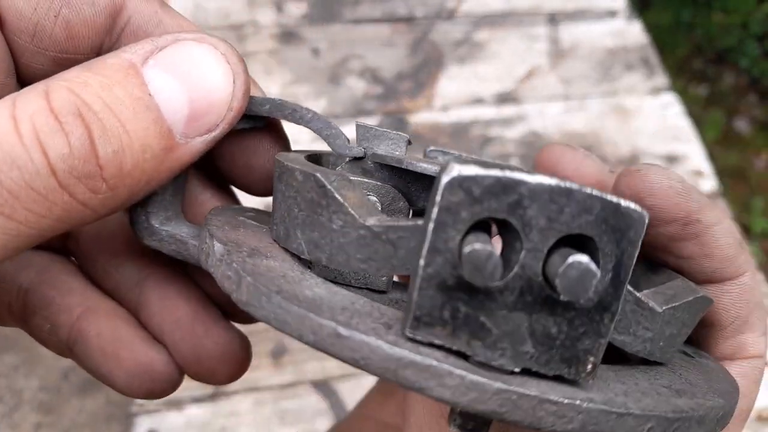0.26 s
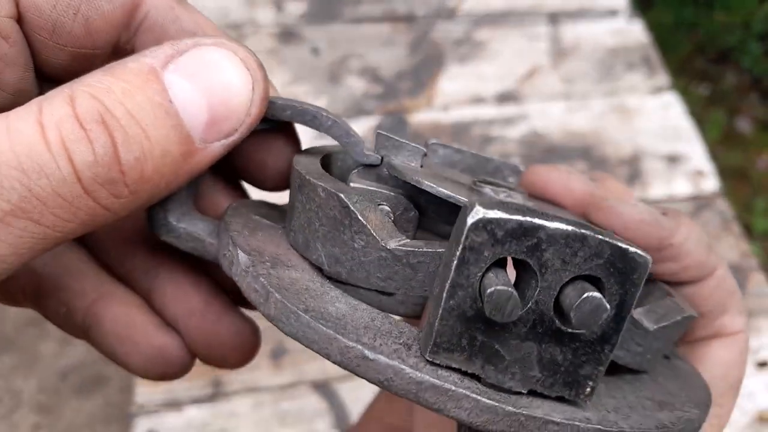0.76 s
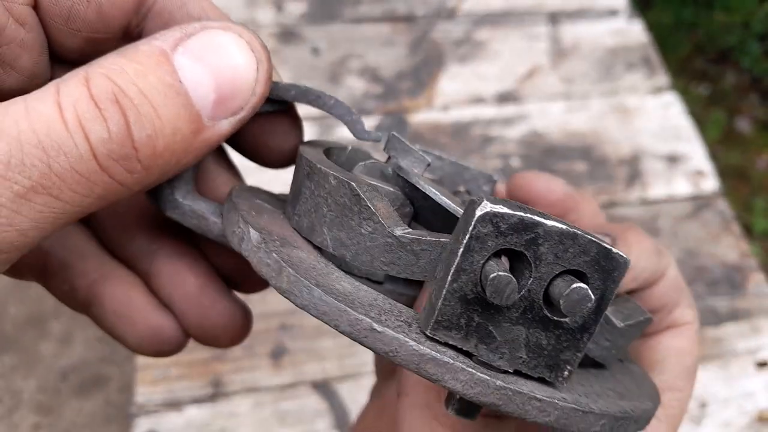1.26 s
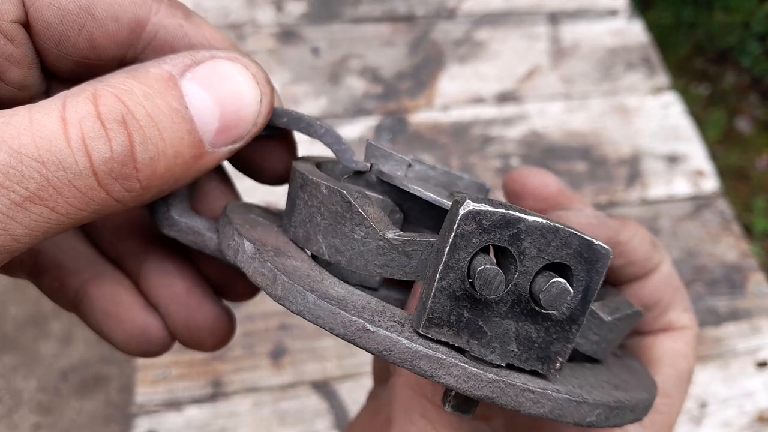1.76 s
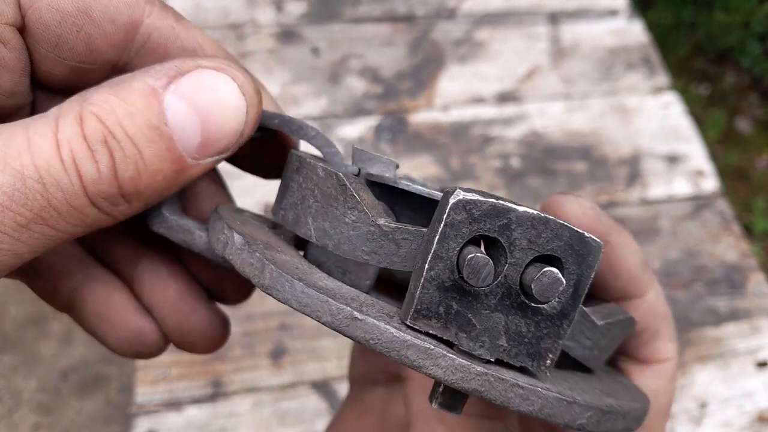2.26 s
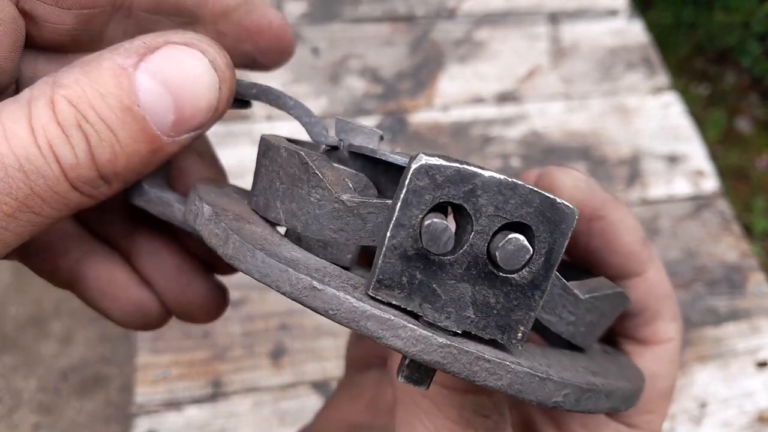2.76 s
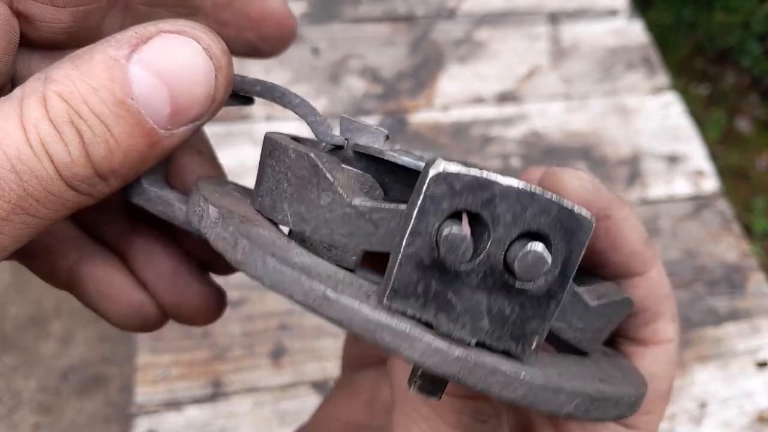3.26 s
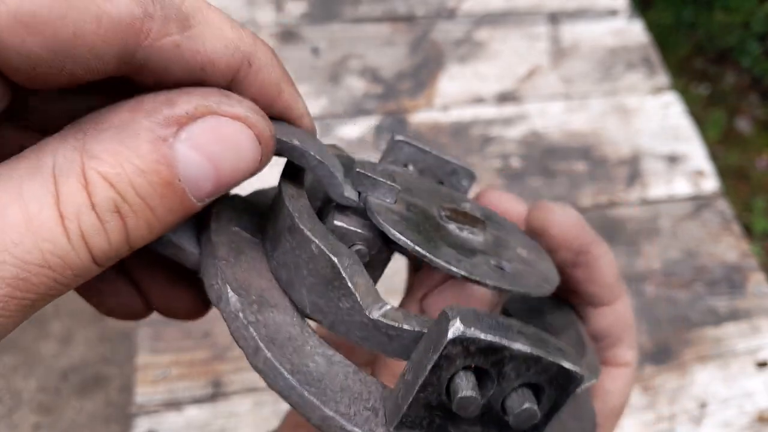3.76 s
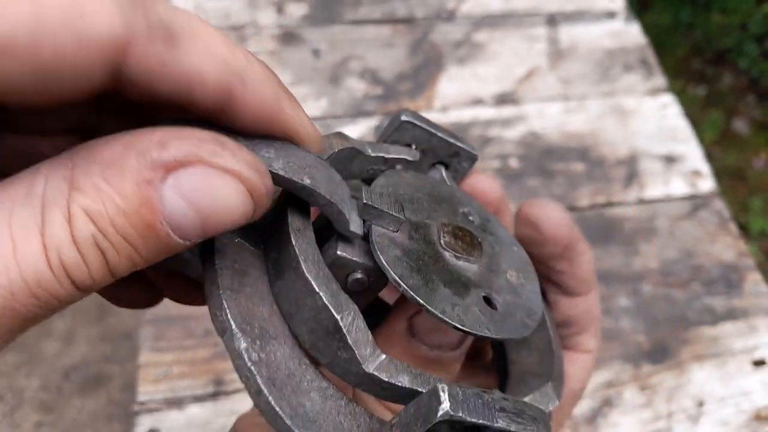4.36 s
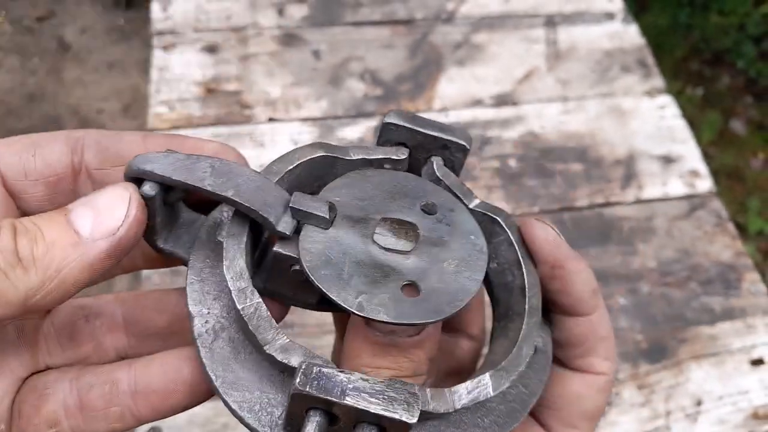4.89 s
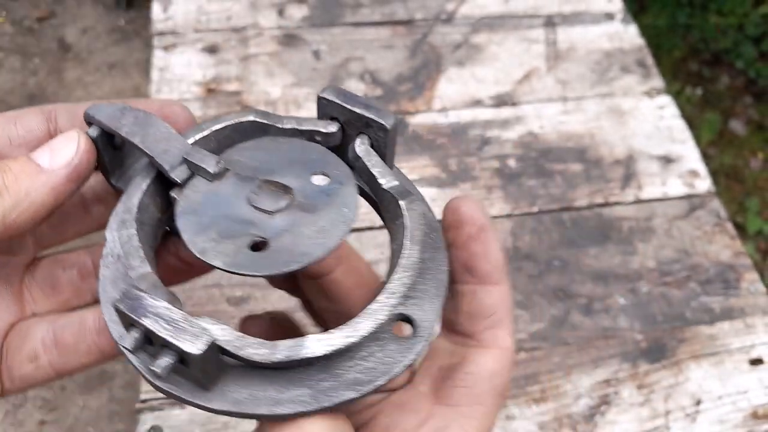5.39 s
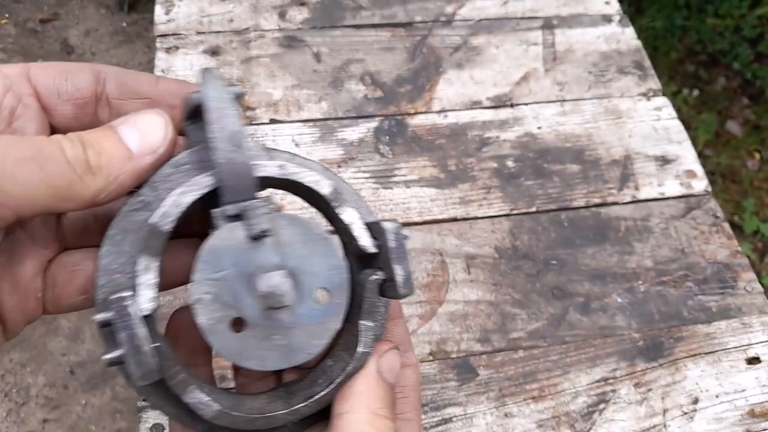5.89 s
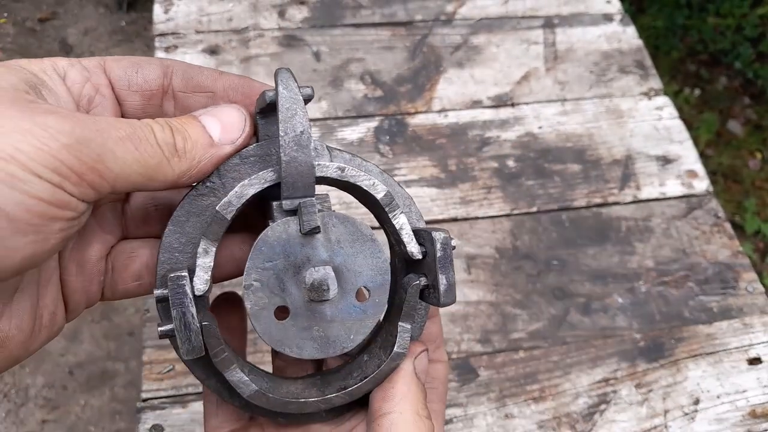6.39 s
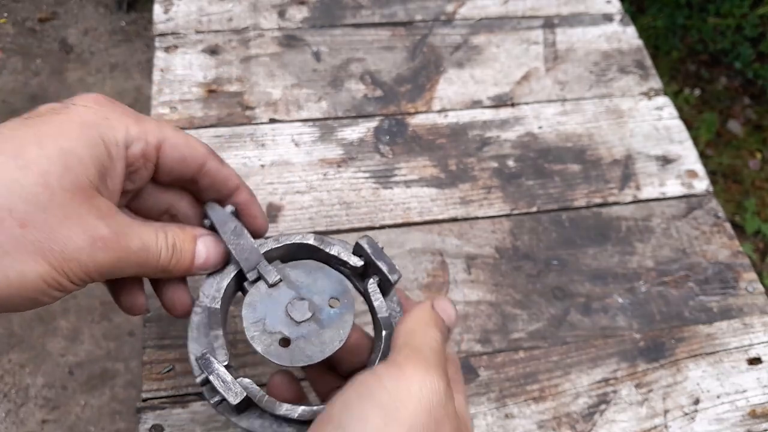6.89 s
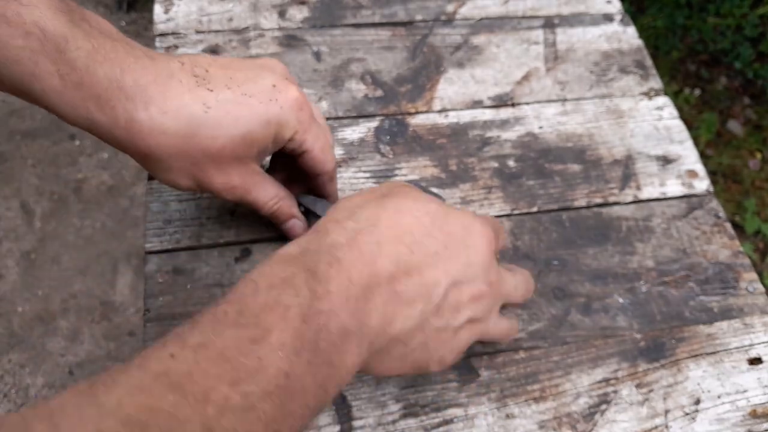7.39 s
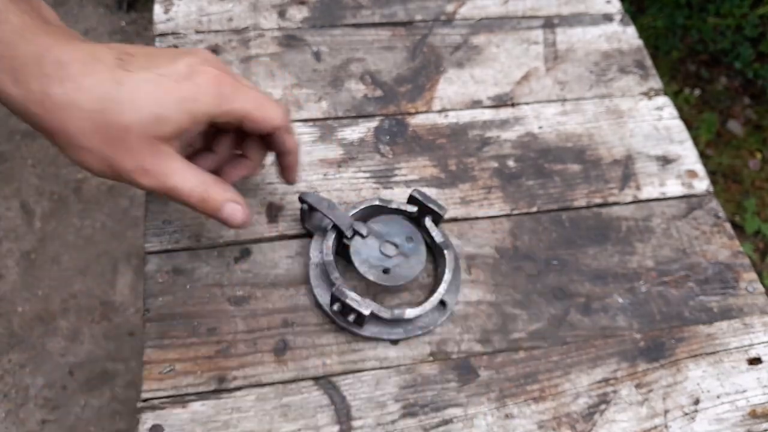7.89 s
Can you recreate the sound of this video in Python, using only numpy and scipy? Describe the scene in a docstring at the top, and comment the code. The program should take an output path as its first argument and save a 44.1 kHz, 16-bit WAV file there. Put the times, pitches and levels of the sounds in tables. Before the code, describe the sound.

A small steel trap is handled close to the microphone in a quiet garden. Light clicks and a few brief, high squeaks come first, followed by a sharp metallic snap. After scattered ticks, two more bright clicks ring out briefly. Near the end, the trap is set on a wooden table with several dull knocks and a little rattle. Faint birds sing throughout over a soft outdoor hush and low rumble.

```python
"""A steel trap on a garden table

A small forged trap is worked in the hands, then set down on wooden planks. Impacts excite the modes
of its frame, trigger plate and lever, stick-slip friction makes the pivot squeak, and the planks
knock under its weight. A warbler and a thrush sing among scattering trees, over a low rumble, the
hush of open air and a brief faint hum. Skin and sleeves rustle as the arms move."""
import sys
import numpy as np
from scipy import signal
from scipy.fft import rfft, irfft, next_fast_len
from scipy.io import wavfile
from scipy.ndimage import uniform_filter1d

SR = 44100
rng = np.random.default_rng(int(sys.argv[2]) if len(sys.argv) > 2 else 0)


def put_to_file(sound):
    """Save the sound as 16-bit audio at rate SR, in the file named by the first command-line argument."""
    columns = np.atleast_2d(sound).T  # one column per channel
    safe = np.clip(columns, -1, 1)
    whole_steps = np.round(safe * 32767)
    wavfile.write(sys.argv[1], SR, whole_steps.astype(np.int16))


N = 358974
TIME = np.arange(N) / SR
AGE = TIME[:SR // 2]  # time since a blow, t/s


def clicks(light_db=-37.5, loose_ms=10, jolt_s=.0039):
    """Impact excitation: steel strikes steel; a harder blow is a shorter contact, and so brighter."""
    # contacts: t/s, crack level/dB, chatter decay/ms, frame level/dB, plate level/dB, left-right/dB
    contacts = [ (.69, -56, 1.5, -64, -60, 2), (1.001, -38.5, 7, -54.5, -68, 7),
                (1.097, -50, 3.5, -43.5, -56, 11), (1.114, -47, 2.5, -68, -70, 4),
                (1.134, -37, 3.3, -36.5, -64, 7), (1.198, -38, 4.5, -59, -66.5, 12),
                (1.327, -50.5, 4.3, -55, -72, 4), (1.613, -35.5, 2, -55, -54.5, 5),
                (1.622, -42, 2.5, -55, -60, 8), (2.314, -64.5, 41, -71, -57.5, 4),
                (2.410, -50, 3.7, -54, -71, 4.5), (2.482, -44.5, 3.1, -35.5, -56.5, 4),
                (2.485, -14, 2.2, -30.5, -42.5, 9.5), (2.491, -31, 2.5, -30.5, -54.5, 8),
                (2.556, -43, 2.6, -52, -68, 2.5), (3.617, -45, 3.4, -47, -48, 0),
                (3.6254, -48.5, 7.8, -36.5, -47, 12), (3.897, -44.5, 1.9, -63, -58, -6),
                (3.954, -39, 1.9, -42, -35.5, 4), (4.145, -43.5, 2.4, -71, -72, 2),
                (4.461, -61, 8.4, -78, -55, 0), (4.490, -40.5, 2, -71, -58, -1),
                (4.578, -39.5, 4.4, -60, -47, 3), (4.897, -38, 3.7, -55, -56, 2),
                (4.9055, -43.5, 3, -45, -57.5, 5), (4.9235, -20.5, 4.2, -33, -29, 2.5),
                (4.9325, -28.5, 6, -31, -45.5, 5.5), (5.2049, -14.5, 1.5, -43, -15.5, 8),
                (5.696, -50, 10.3, -44.5, -41, 8), (5.71, -43.5, 8.4, -68.5, -48, 5),
                (6.227, -46.5, 3.8, -58, -82.5, 6.5), (7.489, -40.5, 7.3, -43, -61.5, 2),
                (7.559, -32, 12.4, -37.5, -58, 3), (7.656, -30, 6.6, -42, -62, 2)]
    # modes of the forged frame: f/Hz, level/dB, T60/s
    frame = [(2190, -33, .1), (4662, -15, .07), (6130, -7, .045), (8255, 0, .07), (8600, -9, .06),
             (9440, -15, .07), (10310, -10, .11), (11740, -3, .06), (14250, -5, .085), (15450, -17, .07)]
    # modes of the trigger plate: f/Hz, level/dB, T60/s
    plate = [(2800, -27, .06), (4400, -8, .035), (6690, -12, .07), (6990, -5, .03), (7920, 0, .05),
             (9720, -11, .08), (11690, -12, .07), (13170, -7, .08), (13400, -15, .08), (14800, -10, .08)]
    # spectrum of the dull clack as the trap's mass jolts in the hands: f/Hz, level/dB
    jolt_spectrum = [(70, 1), (130, 3.5), (260, -7.5), (700, -10.5), (2000, -13), (6000, -32)]
    out = np.zeros((2, N))
    for s, crack_db, decay_ms, frame_db, plate_db, pan_db in contacts:
        force_db = crack_db - light_db
        tilt_db = -6.5 + .39 * force_db + (plate_db > frame_db)  # per octave; 1 dB more on the plate
        crack = chatter(tap(frame if frame_db > plate_db else plate, tilt_db), decay_ms)
        sustain = np.sqrt(decay_ms / loose_ms)  # a loose grip prolongs both chatter and ringing
        body = undb(frame_db) * ring(frame, sustain) + undb(plate_db) * ring(plate, sustain)
        jolt = noise(jolt_spectrum, len(AGE), alike_hz=695) * np.exp(-AGE / jolt_s)
        jolt *= undb(-28.5 + .3051 * force_db)
        add(out, s, sides(pan_db) * (undb(crack_db) * (crack + jolt) + body))
    return out


def tap(modes, tilt_db, width_hz=170, boost_db=11, size=1024):
    """Damping broadens resonance: while the parts touch, their modes colour one tiny impact."""
    # spectrum of the bare contact: f/Hz, level/dB
    contact_spectrum = [(100, -18), (600, -20), (1200, -17.5), (2400, -13.5), (3300, -10.5), (4500, -8),
                        (5500, -3), (7000, -6.5), (8300, -4.5), (9600, -6.5), (10900, -14.5),
                        (12000, -16.5), (14500, -10), (16000, -24.5)]
    f = np.fft.rfftfreq(size, 1 / SR) + 1
    bare = spectral_gain(contact_spectrum, f, tilt_db)
    peaks = sum(undb(db) / (1 + ((f - hz) / width_hz) ** 2) for hz, db, _ in modes)
    # the causal half of the cepstrum gives a minimum-phase pulse
    cepstrum = irfft(np.log(bare * (1 + undb(boost_db) * peaks)))[:size // 2]
    cepstrum[0] = 0
    return irfft(np.exp(2 * rfft(cepstrum, size)))


def chatter(one_tap, decay_ms, count=120, bounce_ms=.6, scatter_db=3):
    """Inelastic rebound: an uneven run of impacts dies away, each reaching the sides a little apart."""
    gap, strength, lag = rng.standard_normal((3, count))
    gaps_ms = bounce_ms * np.exp(gap / 2)
    onsets_ms = np.cumsum(gaps_ms) - gaps_ms[0]
    heights = np.exp(-onsets_ms / decay_ms) * undb(scatter_db * strength)
    train = np.zeros((2, len(AGE)))
    for side, late in zip(train, (lag, -lag)):
        side[(onsets_ms * SR / 1000 + 4 * np.maximum(late, 0)).astype(int)] = heights
    rattle = signal.fftconvolve(train, one_tap[None], axes=1)[:, :len(AGE)]
    return rattle * np.sqrt(decay_ms * SR / 1000 / np.sum(rattle ** 2))


def ring(modes, sustain=1, detune=.001, scatter_db=1.5, rise_ms=.8):
    """Damped modes: the grip shifts and damps them, and each reaches the two sides in its own phase."""
    out = np.zeros((2, len(AGE)))
    for hz, db, t60 in modes:
        shift, left, right, lag = rng.standard_normal(4)
        t = AGE[:int(1.5 * t60 * sustain * SR) + 2]
        cycles = hz * (1 + detune * shift) * t + rng.random() + np.array([[0], [.21 + .06 * lag]])
        gain = undb(db + scatter_db * np.array([[left], [right]]))
        out[:, :len(t)] += gain * np.sin(2 * np.pi * cycles) * decay(t, t60 * sustain)
    return out * (1 - np.exp(-AGE * 1000 / rise_ms))


def free_rings(ping_t60_s=.16, choke_ms=2.2):
    """Free vibration: the unheld lever rings on; a mode hit at its antinode pings until parts close."""
    # modes of the trigger lever: f/Hz, level/dB, T60/s
    lever = [(8258, -20, 0.14), (9453, -13, 0.072), (10310, -2, 0.2), (14240, -10, 0.21),
             (15460, -10, 0.061)]
    # blows that reach the lever: t/s, level/dB
    lever_hits = [(1.136, -51.5), (4.9235, -26.5), (7.489, -55), (7.563, -42)]
    # single modes struck squarely: t/s, f/Hz, level/dB, free time/ms
    pings = [(1.135, 6070, -40, 3.6), (1.198, 8500, -63, 35), (1.327, 8330, -53, 37),
             (2.4858, 8290, -14.5, 4.2), (2.485, 6040, -29, 7.1), (2.4855, 14260, -18, 4.2),
             (2.492, 11800, -33, 16.5), (2.486, 15420, -35, 15), (4.9238, 7750, -28.5, 3),
             (4.928, 4664, -27.5, 15), (4.931, 6130, -36, 8), (4.929, 8615, -28.5, 11),
             (4.928, 2160, -44.5, 17), (5.205, 7915, -20.5, 8.9), (5.205, 6980, -19.5, 1.5),
             (5.205, 4390, -22.5, 3.5), (7.563, 4669, -38.5, 40), (7.563, 14180, -39, 40),
             (7.657, 7150, -32.5, 4.6)]
    out = np.zeros((2, N))
    for s, db in lever_hits:
        add(out, s, sides(3) * undb(db) * ring(lever))
    for s, hz, db, free_ms in pings:
        choke = np.exp(-np.maximum(AGE * 1000 - free_ms, 0) / choke_ms)
        add(out, s, sides(7) * choke * ring([(hz, db, ping_t60_s)], scatter_db=.5, rise_ms=.4))
    return out


def squeaks(octave_db=-20, waver_hz=55, flutter_db=1, grit_db=-28):
    """Stick-slip friction: the pivot locks onto one mode, a near-pure tone with its octave and grit."""
    # slips: peak t/s, rise/ms, fall/ms, f/Hz, glide/(Hz/s), level/dB, left-right/dB
    slips = [(1.0044, 3.5, 6, 7883, -2000, -14.5, 5), (1.661, 6.9, 18, 7180, 993, -34.5, -1),
             (1.781, 12.1, 13.3, 7080, -4500, -25.5, 3), (1.919, 2.3, 4.1, 6830, -20000, -42, 8)]
    out = np.zeros((2, N))
    t = TIME[:SR // 5] - .1  # zero at the peak
    for s, rise_ms, fall_ms, hz, glide, db, pan_db in slips:
        swell = np.exp(-(t * 1000 / np.where(t < 0, rise_ms, fall_ms)) ** 2)
        pitch = hz + glide * t + waver_hz * walk(210, len(t))
        phase = 2 * np.pi * (np.cumsum(pitch) / SR + np.array([[0], [1 / 6]]))
        grit = noise([(3000, -30), (hz * .85, -12), (hz, 0), (hz * 1.13, -14), (16000, -34)], len(t))
        tone = np.sin(phase) + undb(octave_db) * np.sin(2 * phase) + undb(grit_db) * grit
        gain = undb(db + flutter_db * walk(270, len(t)))
        add(out, s + t[0], sides(pan_db) * swell * tone * gain)
    return out


def knocks(thud_s=.021, give_s=.00038, band_hz=(105, 1600)):
    """Impulse response of wood: the trap lands on one edge, rocks and settles on the planks."""
    # landings: t/s, level/dB, relative level of the table-top mode/dB, relative thud level/dB
    landings = [(7.557, -31, 7, 3.5), (7.581, -45, 18, -6), (7.650, -28.5, 2, -6), (7.657, -49, -8, -16),
                (7.675, -33, 6, -6), (7.842, -34.5, -21, -9.5)]
    # modes of the whole table top (first row), then of the planks: f/Hz, level/dB, T60/s
    wood_modes = [(146.3, -2.5, 0.12), (114, -14, 0.38), (317, 1.5, 0.04), (356, 2, 0.092),
                  (499, -4.5, 0.055), (687, -14, 0.087), (956, -29.5, 0.2)]
    # spectrum of the thud: f/Hz, level/dB
    thud_spectrum = [(95, -14), (150, 1.5), (260, 1.5), (400, -13), (750, -14), (1150, -21), (1700, -35),
                     (6000, -27)]
    top, *planks = (undb(db) * np.sin(2 * np.pi * hz * AGE) * decay(AGE, t60)
                    for hz, db, t60 in wood_modes)
    envelope = np.exp(-AGE / thud_s) * (1 - np.exp(-AGE / give_s))
    out = np.zeros((2, N))
    for s, db, top_db, thud_db in landings:
        thud = noise(thud_spectrum, len(AGE), alike_hz=702) * envelope
        add(out, s, -undb(db) * sides(4) * (undb(top_db) * top + sum(planks) + undb(thud_db) * thud))
    # open planks radiate almost nothing below their deepest mode, and the knocks carry no high treble
    return signal.sosfilt(signal.butter(2, band_hz, "band", fs=SR, output="sos"), out)


def warbler(gain_db=-8):
    """Frequency modulation: rising ticks, then a see-saw of two falling notes, husky in their slides."""
    # pitch paths of the three notes: t/s, f/Hz, level/dB, roughness as a fraction of f
    chiff = [(0, 7500, 8.5, .05), (.011, 6000, 6, .05), (.02, 4950, -2, .025), (.036, 4660, -1.5, .008),
             (.078, 4540, -3, .008), (.09, 3900, -5, .04), (.115, 3250, -8.5, .04)]
    chaff = [(0, 7400, 5, .04), (.014, 6420, 2.5, 0.06), (.025, 5590, -1, .025), (.047, 5220, -0.5, 0.01),
             (.058, 4300, -1, .05), (.075, 3640, -4.5, 0.034), (.1, 3466, -9, 0.016)]
    tick = [(0, 3657, 5, 0.0314), (.008, 4570, 5, 0.0474), (.014, 5800, -2.5, .08), (.026, 6780, 6, 0.102)]
    # the song: t/s, level/dB, kind of note
    song = [ (.07, -62.5, "chiff"), (.75, -68, "chiff"), (2.875, -62, "tick"), (2.89, -57, "tick"),
            (2.952, -59.5, "tick"), (2.97, -64, "tick"), (3.118, -65, "tick"), (3.136, -65.5, "tick"),
            (3.21, -66, "tick"), (3.417, -57, "chiff"), (3.752, -54, "chaff"), (4.07, -57, "chaff"),
            (4.394, -50.5, "chiff"), (4.738, -52.5, "chaff"), (5.053, -49, "chiff"),
            (5.405, -54.5, "chaff"), (5.723, -52.5, "chaff"), (6.039, -51.5, "chiff"),
            (6.385, -55, "chaff"), (7.915, -63, "chiff")]
    paths = {"chiff": chiff, "chaff": chaff, "tick": tick}
    out = np.zeros((2, N))
    for s, db, kind in song:
        age, *columns = np.transpose(paths[kind])
        t = TIME[:int(age[-1] * SR)]
        hz, shape_db, roughness = (np.interp(t, age, column) for column in columns)
        add(out, s, whistle(hz, db + shape_db, roughness, waver_rate=900))
    return echoes(out * sides(1.4), t60=.45, wet_db=5.5, gap_s=.005, blur_hz=80) * undb(gain_db)


def thrush(through_trees_db=-.45):
    """Gliding tones: fluted arcs and flicks, with thin notes of farther birds, scattered by trees."""
    # notes: t/s, duration/s, first f/Hz, middle f/Hz, last f/Hz, level/dB
    notes = [ (0.407, 0.093, 4040, 3900, 3810, -72.5), (0.478, 0.1, 1923, 1784, 2050, -63.5),
             (0.728, 0.13, 2340, 2270, 2190, -60), (0.829, 0.078, 2136, 1827, 1830, -67),
             (1.121, 0.1, 2420, 2564, 2650, -60), (1.205, 0.04, 2480, 2090, 1610, -60.5),
             (1.331, 0.032, 2450, 2270, 2090, -60), (1.352, 0.027, 1950, 1800, 1530, -53.5),
             (1.415, 0.02, 1930, 1793, 1480, -57), (1.468, 0.14, 2190, 2282, 2337, -57.5),
             (1.471, 0.083, 4430, 4410, 4100, -71.5), (1.534, .024, 1950, 1756, 1530, -57),
             (1.573, 0.11, 1694, 2075, 1670, -60), (1.891, 0.13, 6000, 6030, 6060, -73.5),
             (2.013, 0.26, 3080, 2980, 3090, -74), (2.068, .2, 2190, 2290, 2220, -72),
             (2.295, 0.052, 2520, 2260, 2390, -61), (2.376, 0.2, 5880, 6060, 5940, -72.5),
             (2.507, 0.098, 1830, 2125, 2245, -58), (2.618, 0.101, 2424, 2477, 2508, -61.5),
             (6.905, 0.033, 2250, 2250, 2200, -60), (6.961, 0.05, 2216, 2270, 2160, -58.5),
             (7.002, 0.059, 2186, 1980, 1807, -61), (7.131, 0.098, 2280, 2305, 2270, -57.5),
             (7.408, 0.16, 1550, 1722, 2106, -59), (7.652, 0.18, 1796, 1926, 1900, -58.5),
             (7.784, 0.073, 1927, 2570, 2660, -55), (7.952, 0.045, 1870, 2320, 2393, -58),
             (8.017, 0.092, 1880, 2300, 2340, -57.5)]
    out = np.zeros((2, N))
    for s, length, first, middle, last, db in notes:
        parabola = np.polyfit([0, .5, 1], [first, middle, last], 2)
        pitch = np.polyval(parabola, np.linspace(0, 1, int(length * SR)))
        add(out, s, whistle(pitch, db, waver=.011))
    return echoes(out * sides(1), t60=.62, wet_db=2, gap_s=.02, blur_hz=45) * undb(through_trees_db)


def sleeves(grain_db=2.2, grain_rate=140):
    """Friction noise: skin and sleeves brush in small catches as each movement swells and dies away."""
    # movements of the hands and arms: fastest at t/s, rise/s, fall/s, level/dB
    moves = [(1.1, 0.18, 0.2, -60.5), (4.88, 0.15, 0.47, -65), (5.391, 0.023, 0.024, -59.5),
             (7.611, 0.23, 0.09, -51.5), (8.02, 0.4, 0.48, -61.5)]
    # spectrum of the brushing: f/Hz, level/dB
    spectrum = [(500, 7), (2000, 0), (4500, -4), (8000, -7), (11000, -11), (15500, -12)]
    swells = [undb(db) * np.exp(-np.abs(TIME - s) / np.where(TIME < s, rise_s, fall_s))
              for s, rise_s, fall_s, db in moves]
    envelope = np.linalg.norm(swells, axis=0)  # powers add
    return sides(1.5) * noise(spectrum, N) * envelope * undb(grain_db * walk(grain_rate))


def hum(start_s=1.25, length_s=.65, hz=298, db=-65):
    """Amplitude modulation: a faint, wavering low tone swells and fades far off."""
    out = np.zeros((2, N))
    add(out, start_s, whistle(np.full(int(length_s * SR), hz), db, waver=.023))
    return out


def garden(air_db=-64, rumble_db=-1, split_hz=75, sway_db=2, flicker_db=1.4):
    """Ambient noise: a swaying rumble, coherent on both sides, under the diffuse hush of open air."""
    # spectra of the air and of the rumble: f/Hz, level/dB
    air_spectrum = [(150, -7.5), (400, -6.5), (700, -6.5), (1200, -8.5), (1800, -14), (2400, -19.5),
                    (3100, -26), (4500, -24.5), (7000, -27.5), (10000, -32), (16000, -40.5)]
    rumble_spectrum = [(25, -24.5), (40, -6.5), (54, 13.5), (80, -1.5), (112, 3.5), (160, -2.5),
                       (210, -4.5), (300, -10.5), (500, -47)]
    # course of the rumble: t/s, deep band level/dB, upper band level/dB
    rumble_levels = [(0.0, -69, -62), (0.17, -53, -54.5), (0.4, -64.5, -57.5), (1.84, -48, -57.5),
                     (1.9, -68, -60), (2.231, -55, -58.5), (3.499, -60, -60.5), (4.53, -53, -56.5),
                     (4.68, -64, -69), (4.911, -59, -55), (5.64, -64.5, -62.5), (7.5, -68, -57.5)]
    s, deep_db, upper_db = np.transpose(rumble_levels)
    out = noise(air_spectrum, N, alike_hz=842) * undb(air_db + flicker_db * walk(18))
    for kind, db in (("low", deep_db), ("high", upper_db)):
        crossover = signal.butter(4, split_hz, kind, fs=SR, output="sos")
        band = signal.sosfilt(crossover, noise(rumble_spectrum, N, alike_hz=600.4))
        out += band / band.std() * undb(np.interp(TIME, s, db) + rumble_db + sway_db * walk(11))
    return sides(.94) * out


def whistle(hz, db, waver, flutter_db=3, waver_rate=400):
    """Random modulation: a tone on a pitch path, unsteady in pitch and level, faded at both ends."""
    n = len(hz)
    swell = signal.windows.tukey(n, 1 / 3) * undb(db + flutter_db * walk(90, n))
    pitch = hz * (1 + waver * walk(waver_rate, n))
    return swell * np.sin(2 * np.pi * np.cumsum(pitch) / SR)


def echoes(x, t60, wet_db, gap_s, blur_hz=0):
    """Diffuse scattering: a decaying tail builds up behind the direct sound; leaves blur its pitch."""
    t = TIME[:SR]
    tail = rng.standard_normal((2, SR)) * decay(t, t60) * (1 - np.exp(-(t / gap_s) ** 2))
    tail /= np.sqrt(np.sum(tail ** 2, axis=1, keepdims=True))
    scattered = x
    if blur_hz:
        drift = 2 * np.pi * np.cumsum(blur_hz * walk(300)) / SR
        scattered = np.real(signal.hilbert(x, next_fast_len(N))[:, :N] * np.exp(1j * drift))
    return x + undb(wet_db) * signal.fftconvolve(scattered, tail, axes=1)[:, :N]


def noise(points, size, alike_hz=1):
    """Partial coherence: shaped stereo noise of unit rms whose sides converge below alike_hz."""
    padded = next_fast_len(size)
    f = np.fft.rfftfreq(padded, 1 / SR) + 1
    low_cut = np.minimum(f / points[0][0], 1) ** 2
    mid, side = rfft(rng.standard_normal((2, padded))) * spectral_gain(points, f) * low_cut
    side *= f / np.hypot(f, alike_hz)
    x = irfft([mid + side, mid - side], padded)[:, :size]
    return x / x.std()


def spectral_gain(points, f, tilt_db=0):
    """Spectral envelope through (f/Hz, level/dB) points, its treble tilted by tilt_db per octave."""
    hz, db = np.transpose(points)
    return undb(np.interp(np.log(f), np.log(hz), db) + tilt_db * np.log2(np.clip(f, 3500, 16000)))


def walk(rate, size=N):
    """Low-pass noise: rate random values a second, smoothed, with a spread near 1."""
    hold = int(SR / rate)
    steps = np.repeat(rng.standard_normal(size // hold + 2), hold)
    return 1.3 * uniform_filter1d(uniform_filter1d(steps, hold), hold)[:size]


def decay(t, t60):
    """Exponential damping: 60 dB down at t60."""
    return np.exp(-np.log(1000) * t / t60)


def undb(db):
    """Amplitude ratio of a level in decibels."""
    return 10 ** (np.asarray(db) / 20)


def sides(pan_db):
    """Level-difference panning: two gains, the left pan_db above the right."""
    return undb(np.array([[pan_db], [-pan_db]]) / 2)


def add(out, s, sound):
    """Superposition: a sound joins the mix at s seconds."""
    start = max(int(s * SR), 0)
    n = min(sound.shape[-1], N - start)
    out[:, start:start + n] += sound[..., :n]


def scene():
    """Direct and scattered sound: the trap echoes off the table and garden; birds and air lie behind."""
    steel = clicks() + free_rings() + squeaks()
    at_table = echoes(steel, t60=.11, wet_db=-17, gap_s=.0054) + knocks()
    in_garden = echoes(at_table, t60=.45, wet_db=-38.5, gap_s=.013)
    return in_garden + warbler() + thrush() + hum() + garden() + sleeves()


def record(dry, top_hz=16200):
    """Band limiting: a steep elliptic low-pass removes the highest treble."""
    return signal.sosfilt(signal.ellip(8, .2, 70, top_hz, fs=SR, output="sos"), dry)


dry = scene()
out = record(dry)
put_to_file(out)
```